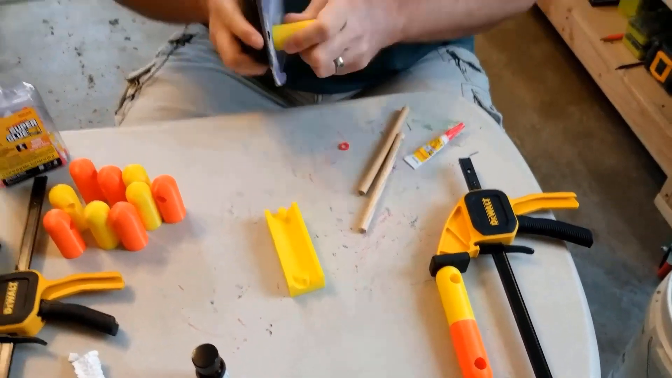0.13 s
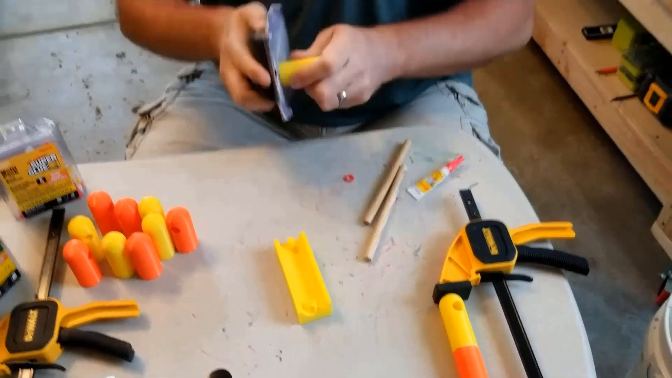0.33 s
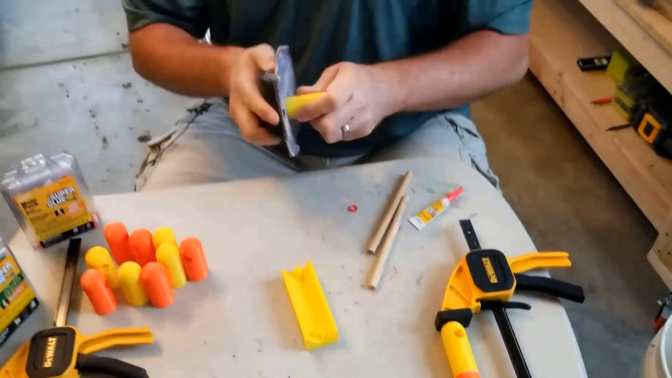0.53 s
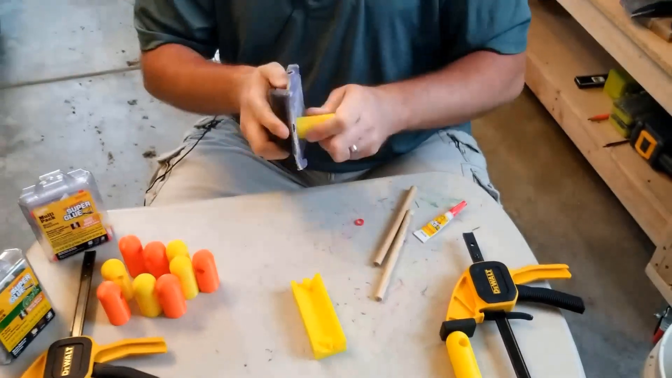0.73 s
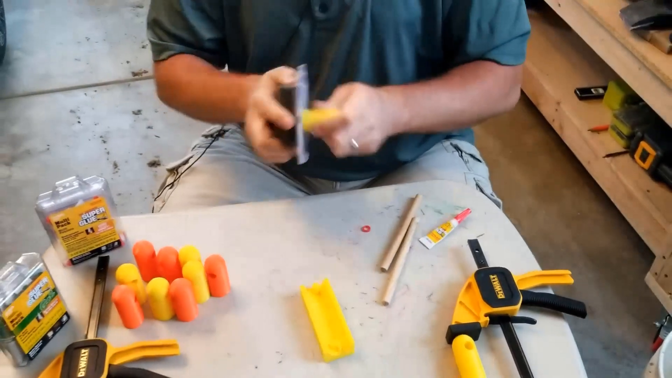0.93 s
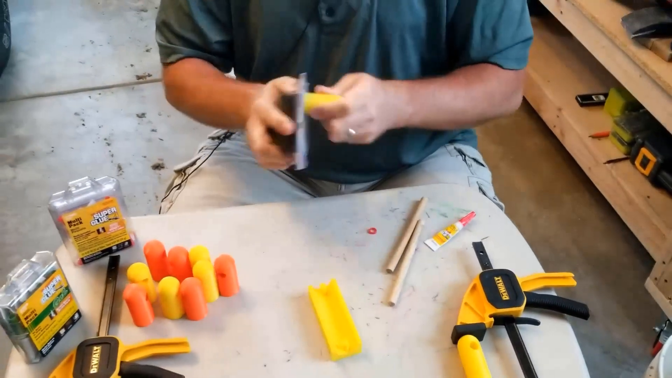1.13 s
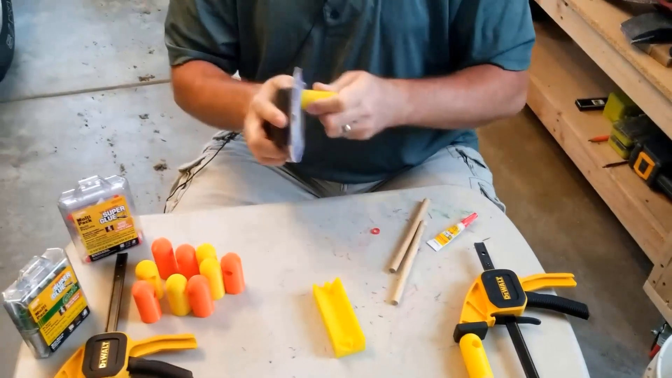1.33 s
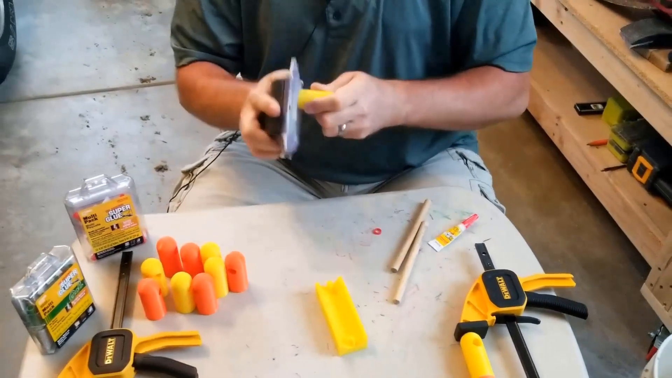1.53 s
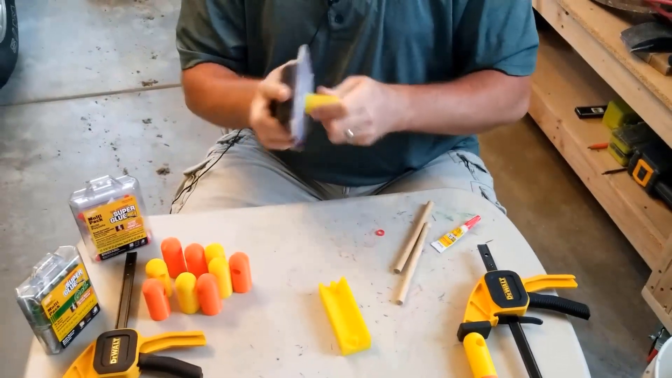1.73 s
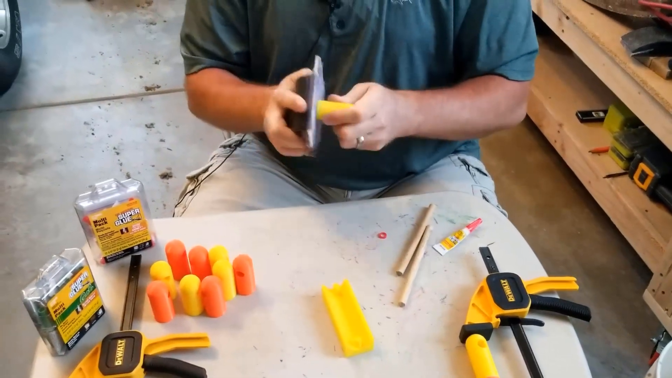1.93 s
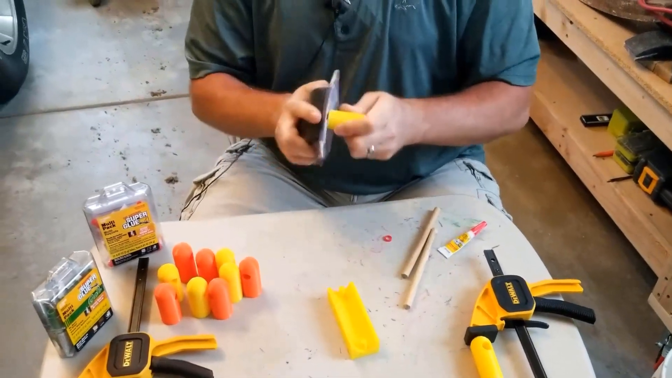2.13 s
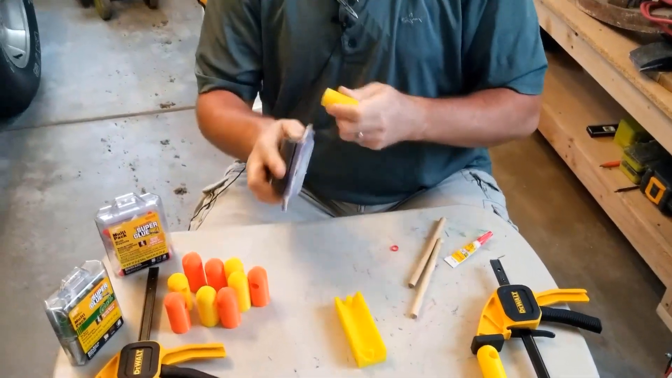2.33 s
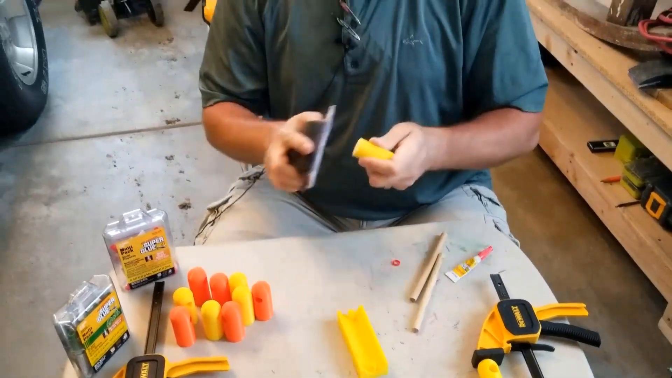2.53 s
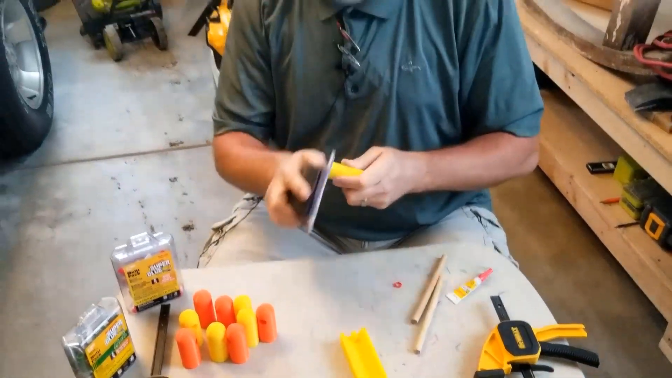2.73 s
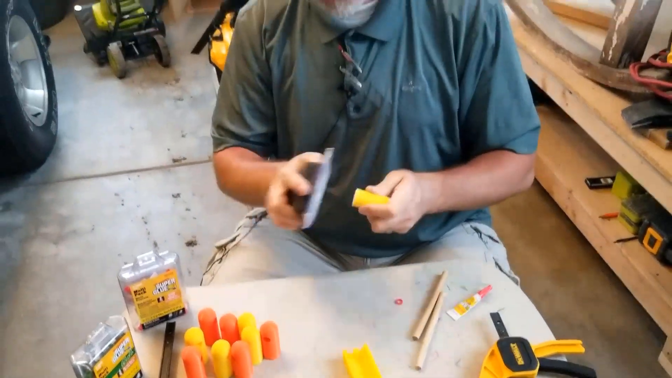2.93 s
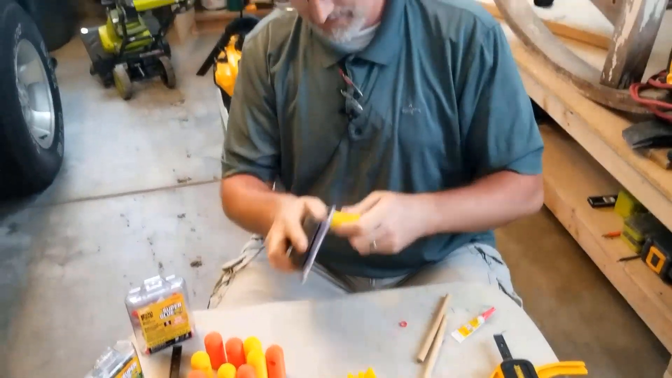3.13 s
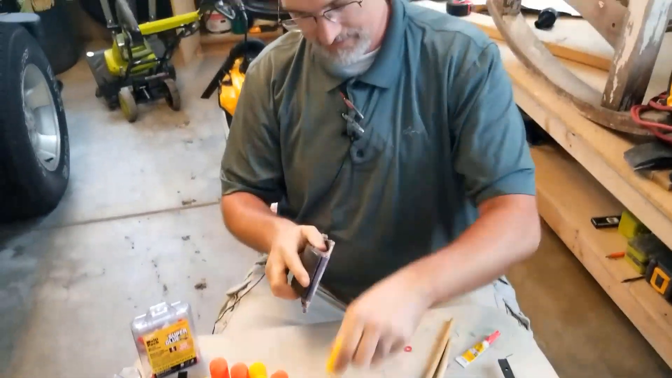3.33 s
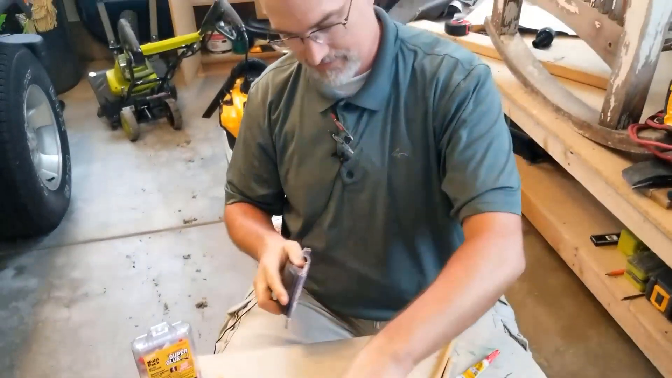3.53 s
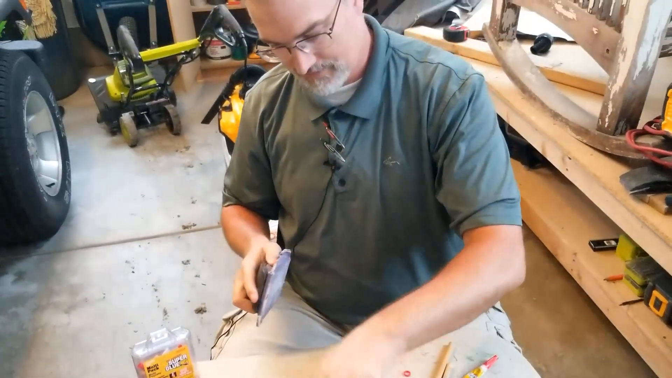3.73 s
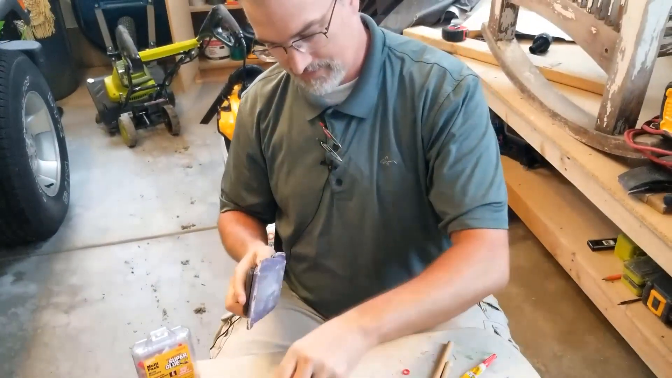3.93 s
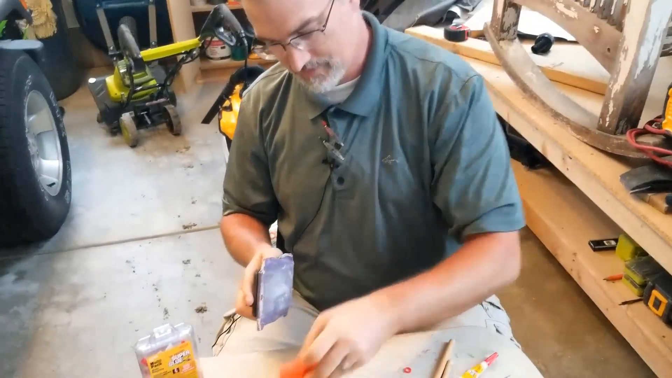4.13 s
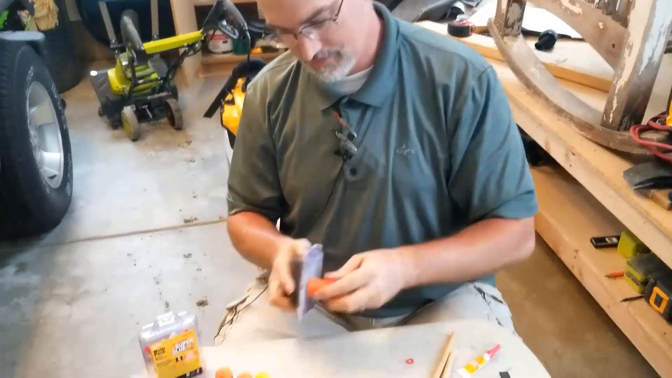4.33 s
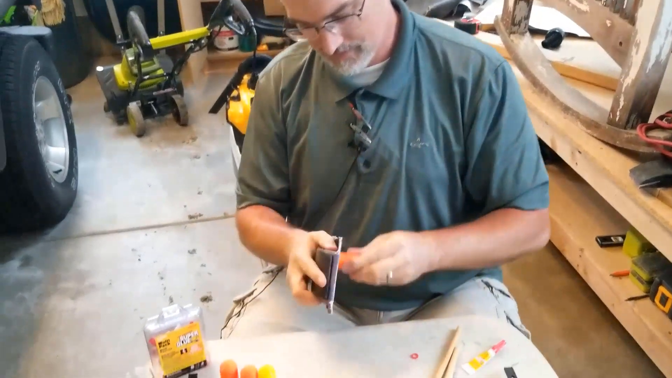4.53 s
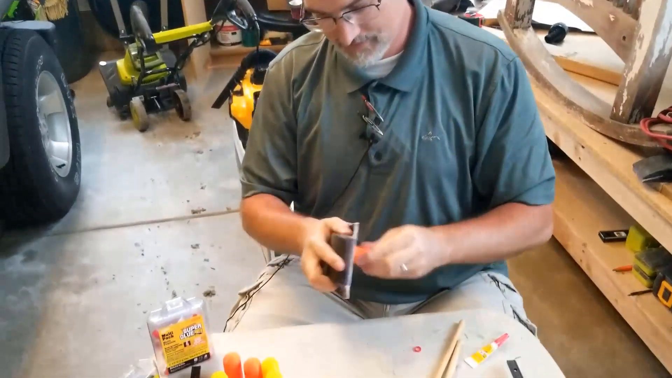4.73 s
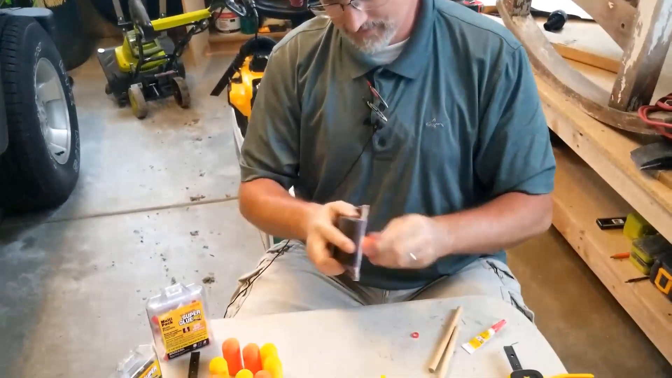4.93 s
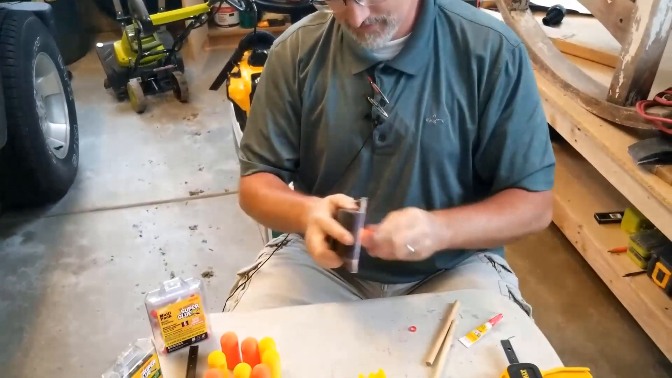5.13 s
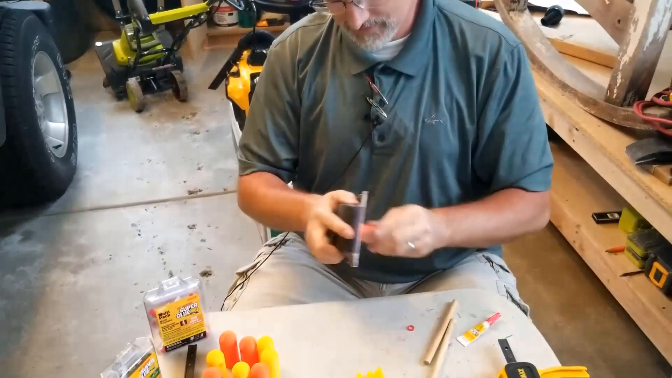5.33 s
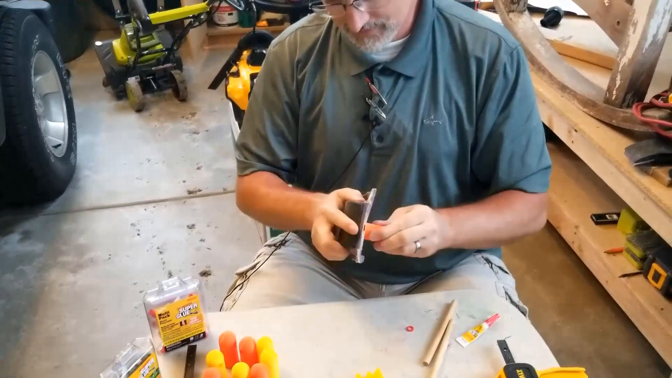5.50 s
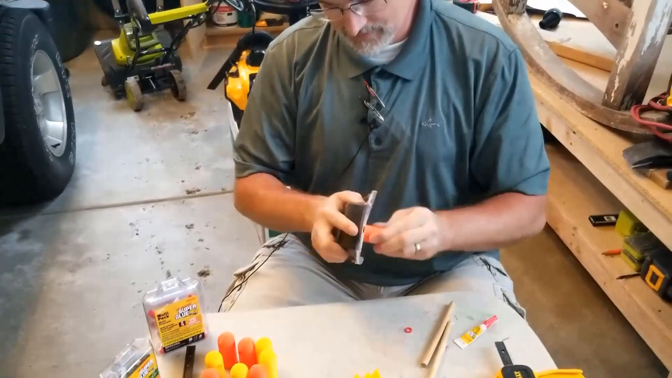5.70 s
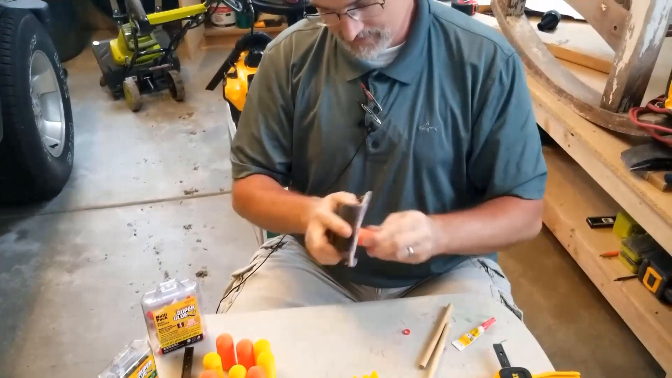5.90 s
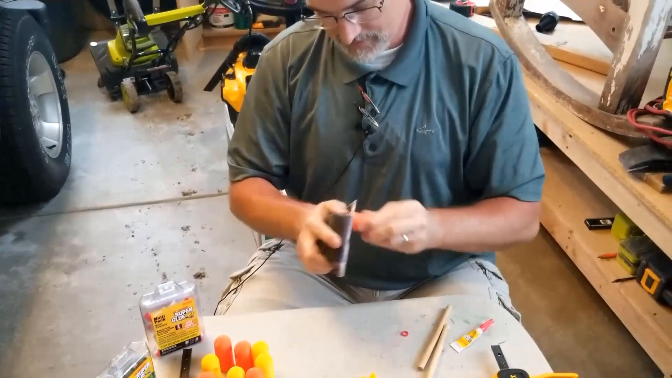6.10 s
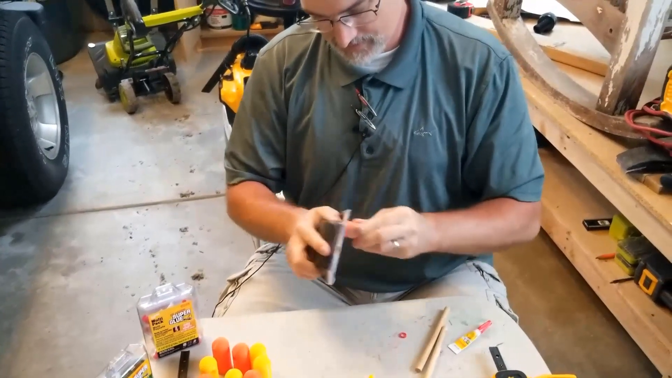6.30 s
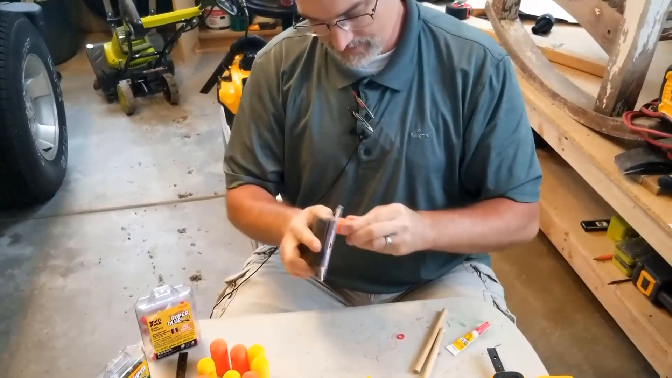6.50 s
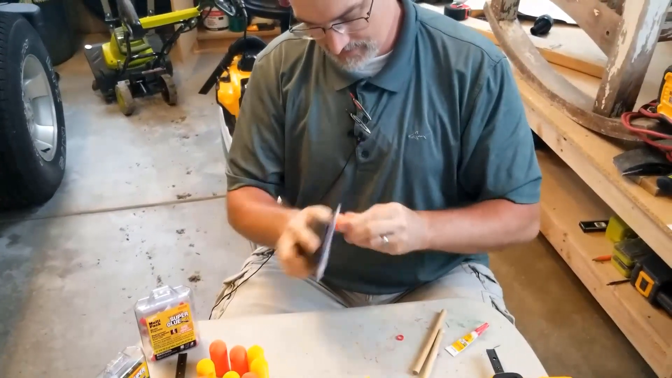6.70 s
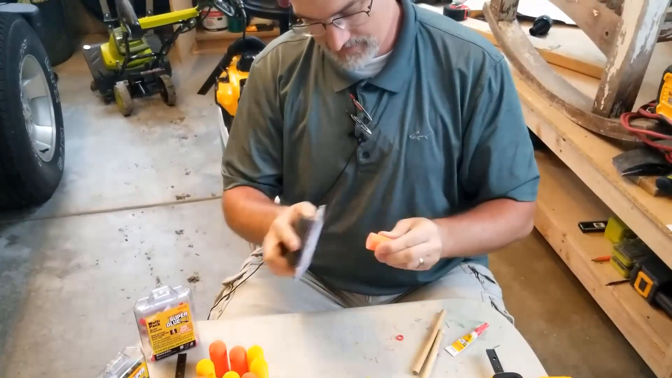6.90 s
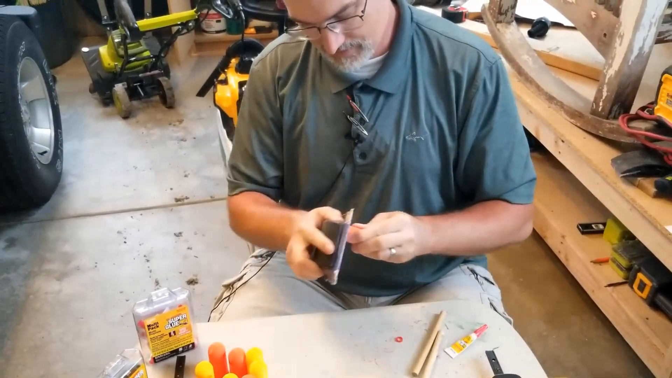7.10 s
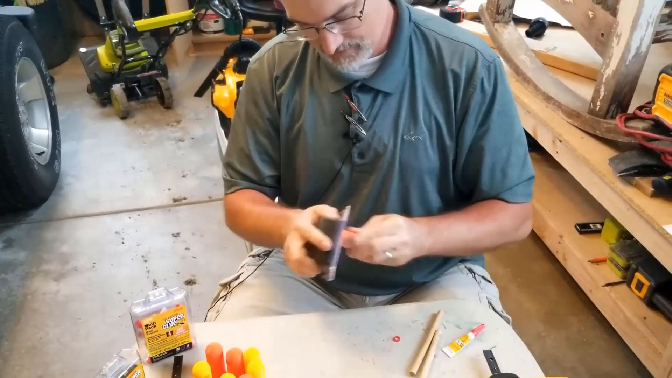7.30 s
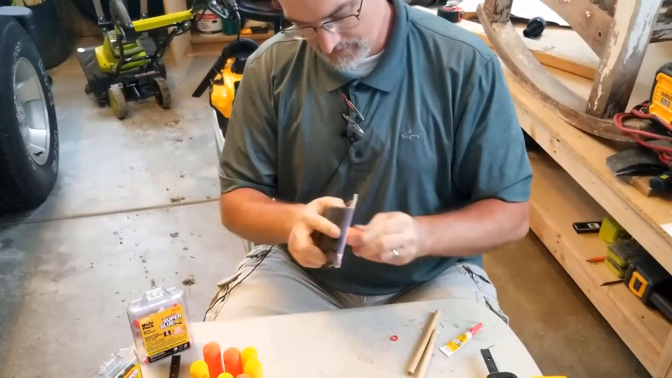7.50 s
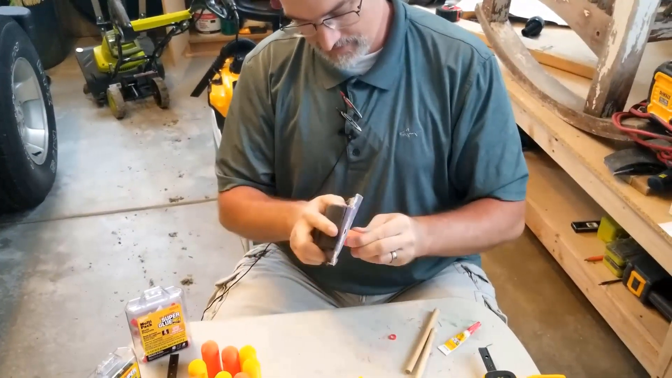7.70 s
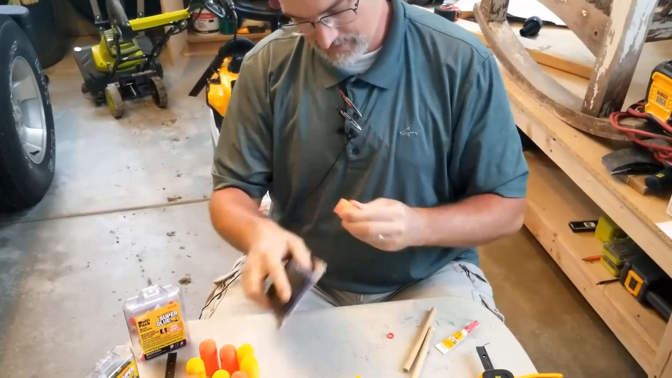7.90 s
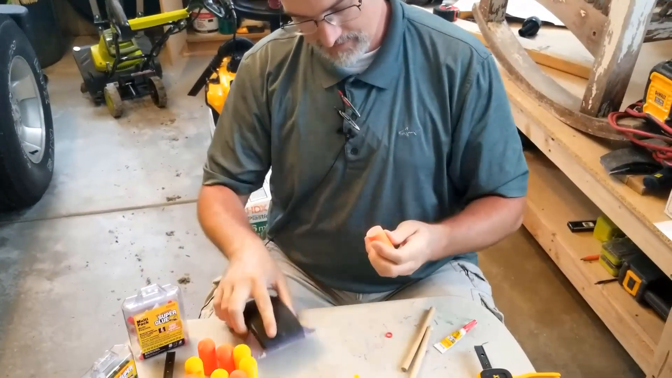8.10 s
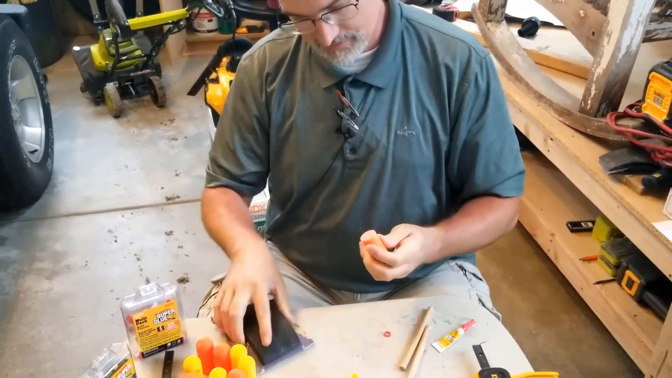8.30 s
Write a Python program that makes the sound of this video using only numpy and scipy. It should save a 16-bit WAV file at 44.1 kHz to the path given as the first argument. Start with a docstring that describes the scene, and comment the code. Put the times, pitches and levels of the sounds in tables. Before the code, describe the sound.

A small plastic part scrapes back and forth on a hand-held sandpaper pad right from the start, about ten short, gritty strokes a second. Around 2 seconds the rubbing loosens into separate scrapes and flicks, with sharp taps on the pad at about 2.7 and 3 seconds. At 3.5 seconds a piece is set on a hollow table with a clear, briefly ringing knock, followed by a lull.

Light taps at 4.5 seconds start a second run of fast, bright sanding. At 6.7 seconds the part slips off the edge with a sharp click, then taps back on just after 7 seconds. More strokes end in a flick near 7.9 seconds, and the pad is put down with soft knocks around 8.2 seconds. The sound is close and mono, with occasional faint low thumps and air puffs on the microphone and a short garage echo over quiet background air.

```python
"""A small plastic part is rubbed to and fro by hand on sandpaper held on a pad, close to a mono microphone.
Grit clicks ring the pad, which jolts as the hand turns and twangs as the part catches or slips off.
The part taps the pad; things are set down on a hollow table. Low thumps and draughts reach the
microphone directly. Bare garage walls add a short tail over a quiet noise floor."""
import sys
import numpy as np
from scipy import signal
from scipy.io import wavfile
from scipy.ndimage import uniform_filter1d

SR = 44100
rng = np.random.default_rng(int(sys.argv[2]) if len(sys.argv) > 2 else 0)


def wav_out(sig):
    """Save sig, one row per channel (or a flat mono array), as 16-bit PCM at SR to the path in sys.argv[1]."""
    wavfile.write(sys.argv[1], SR, np.round(np.clip(np.atleast_2d(sig).T, -1, 1) * 32767).astype(np.int16))


N = 368235


def sanding(uneven_db=2.0, chatter_db=2.0, patch_db=2.1, grip_scatter=0.02):
    """The part breaks loose and slides: grit clicks of uneven size ring four groups of resonances."""
    # (start [s], length [s], level [dB], swell from start to end [dB], kind)
    strokes = [(.008, .08, -24, 10.5, "push"), (0.112, 0.092, -29.5, -1, "pull"),
               (0.212, 0.082, -27.5, 6, "push"), (.31, 0.076, -30, 6, "pull"),
               (0.408, 0.088, -28.5, 4, "push"), (0.512, 0.084, -32, -0.5, "pull"),
               (0.607, 0.089, -28, 7.5, "push"), (0.709, 0.1, -31.5, 0.5, "pull"),
               (0.814, 0.099, -27, 5.5, "push"), (.928, .044, -30.5, 5, "pull"),
               (.963, 0.093, -29.5, -2.5, "out"), (1.032, 0.066, -30, -2, "in"),
               (1.077, 0.075, -28.5, -5, "out"), (1.132, 0.075, -31, -2, "in"),
               (1.19, 0.079, -28.5, -4, "out"), (1.253, 0.076, -28, -0.5, "in"),
               (1.312, 0.064, -28.5, -5, "out"), (1.378, 0.16, -33.5, -5.5, "out"),
               (1.474, .13, -31, 3.5, "in"), (1.598, .044, -30, 6.5, "in"),
               (1.635, 0.099, -29.5, -6, "out"), (1.709, 0.095, -30, 5, "in"),
               (1.783, 0.099, -28, -3, "out"), (1.874, 0.081, -32, -7, "out"), (1.948, .14, -32, 0.5, "in"),
               (2.072, 0.14, -30, 1, "in"), (2.228, 0.077, -28, 11.5, "drag"),
               (2.301, .032, -23, 7, "flick"), (2.329, 0.031, -42, -13, "shiver"),
               (2.665, 0.16, -29, -3.5, "ease"), (2.75, 0.033, -28.5, 2, "flick"),
               (3.047, .12, -35, -5.5, "ease"), (3.187, 0.038, -48.5, -8, "brush"),
               (4.471, 0.028, -46.5, 2, "brush"), (4.503, .12, -29, 9, "push"),
               (4.648, 0.078, -29.5, -0.5, "pull"), (4.753, 0.089, -28, 6, "push"),
               (4.868, .09, -29.5, 1, "pull"), (4.968, 0.078, -27.5, 6, "push"),
               (5.07, 0.09, -31.5, -.5, "pull"), (5.168, 0.084, -26, 4.5, "push"),
               (5.273, 0.079, -28.5, 1, "pull"), (5.372, 0.074, -24.5, 11, "push"),
               (5.472, 0.086, -28.5, 3, "pull"), (5.578, 0.08, -25, 9, "push"),
               (5.676, 0.087, -28, 3, "pull"), (5.784, 0.081, -25, 5.5, "push"),
               (5.876, 0.093, -27.5, 1, "in"), (5.988, .071, -28, 1.5, "in"),
               (6.039, 0.08, -25, -0.5, "out"), (6.112, 0.08, -29, -7, "in"),
               (6.182, .088, -30.5, 4.5, "in"), (6.252, 0.095, -29, -6.5, "out"),
               (6.336, .12, -31, -13, "out"), (6.426, .11, -29.5, 5.5, "out"),
               (6.542, .12, -28.5, -8, "ease"), (6.671, 0.071, -27.5, 7.5, "drag"),
               (6.734, .032, -19, 4, "flick"), (6.767, 0.015, -34, -14, "shiver"),
               (7.067, .1, -31, 3, "ease"), (7.198, 0.083, -30.5, 0, "pull"), (7.303, .089, -26, 4, "push"),
               (7.412, .088, -27, 5.5, "push"), (7.524, 0.1, -30.5, 1.5, "pull"),
               (7.666, 0.076, -28, 6, "drag"), (7.788, .01, -32.5, 2, "drag"),
               (7.802, .064, -28, 11.5, "drag"), (7.866, 0.012, -21, -3, "flick"),
               (7.877, 0.034, -37, -3, "shiver"), (8.084, 0.041, -43.5, -12, "brush"),
               (8.127, .05, -45.5, -6, "brush"), (8.189, 0.076, -42.5, -10, "brush"),
               (8.323, 0.057, -49, 8, "brush")]
    # push, pull: straight; out, in: half circles to the pad's edge and back; ease: gentle, after landing;
    # drag: hard last stroke; flick: tears off the edge; shiver: freed pad trembles; brush: light touch
    # kind: (start softness, end softness, scratch [Hz], ring [Hz], treble [dB], ring [dB],
    #        ring swell [dB], rasp [dB])
    kinds = {"push": (0.3, 0.65, 6252, 3020, -3.2, -0.9, 7.5, 0.9),
             "pull": (0.28, .51, 5950, 3012, -4, .2, -12, 4.5),
             "out": (0.43, 0.35, 5950, 3154, -3, 2.1, 8, 1.4),
             "in": (0.48, 0.39, 5650, 3210, -4, 0.5, -9.5, 1.9),
             "ease": (0.94, 0.73, 5650, 3080, -2, 1, 0, 3.5),
             "drag": (0.18, 0.35, 5550, 2948, -2, 1.3, 5, 5),
             "flick": (0.3, 0.44, 5500, 3153, -3, 5.5, -3, 1),
             "shiver": (-0.6, 0.3, 5200, 2850, -14, 11, -3.5, 7),
             "brush": (0.8, 0.6, 5600, 3000, -6.5, 2, -1, 11.5)}
    # slowly changing hold (time [s], scratch pitch [x], ring pitch [x], ring [dB], rasp [dB], treble [dB])
    hold = [(0, 1.03, 1, -.5, -1.5, -.3), (.8, 1.02, 1.01, -.5, -0.5, -0.5),
            (1.05, 1, 1.03, .5, -0.5, -0.2), (1.3, 0.97, 1.02, .3, -1, -0.2), (1.6, 1.01, 1, .3, 0, 0.5),
            (1.9, .99, 0.97, 1.5, 2, 0), (2.15, 1.01, 1.01, -1, -1, 1), (2.7, 0.99, 1.06, .5, 1, 0),
            (3.1, 0.94, 1, 3, 2, -1), (4.5, 0.93, .92, -.5, 3, -0.5), (4.9, 1, 0.99, -1.5, 1, 1),
            (5.3, 1.01, .99, 1.5, 0.1, -.3), (5.7, 0.98, 1.02, -.5, -0.1, 1.5),
            (6.05, 1.03, 0.99, 1, -1.5, 1), (6.3, 1.01, .99, -1, 1, -1), (6.7, 1.04, 1.03, -1, -1.5, -0.3),
            (7.2, 0.97, 1.03, 0, -1.5, 0.7), (7.5, 0.91, 0.98, 1.5, 2, 0.3),
            (7.7, 0.98, 0.9, 1.5, 0.5, -3.5), (7.85, 1.02, 1.01, -1.2, -1.5, 1.5),
            (8.1, 1.07, 1.03, 4, 5, 3), (8.35, 0.99, 0.97, -2, -.5, 0)]
    # low rasp (centre [Hz], width [Hz], level [dB])
    rasp = [(454, 600, -22.5), (920, 690, -38.5), (1484, 710, -18.5)]
    # pad ring (centre [x ring_hz], width [x ring_hz], level [dB])
    ring = [(0.823, 0.15, -15.5), (.95, 0.087, -15), (1.099, 0.26, -11.5)]
    # part on paper (centre [x scratch_hz], width [x scratch_hz], level [dB])
    scratch = [(.7, 0.22, -11.5), (.86, 0.19, -8), (1.0, 0.18, -6.5), (1.17, 0.31, -7.5), (1.4, 0.38, -9)]
    # finest grit (centre [Hz], width [Hz], level [dB])
    hiss = [(9440, 3900, -5.5), (11850, 6500, -2.5), (15100, 1900, -3.5)]
    hold_s, *hold_columns = np.transpose(hold)
    grips = 1 + grip_scatter * rng.standard_normal((len(strokes), 2))  # each grip detunes its stroke
    out = np.zeros(N)
    for (start_s, length_s, db, swell_db, kind), grip in zip(strokes, grips):
        soft_in, soft_out, scratch_hz, ring_hz, treble_db, ring_db, ring_swell_db, rasp_db = kinds[kind]
        held = [np.interp(start_s, hold_s, column) for column in hold_columns]
        scratch_hz, ring_hz = grip * held[:2] * (scratch_hz, ring_hz)
        ring_db, rasp_db, treble_db = np.add(held[2:], (ring_db, rasp_db, treble_db))
        progress = np.linspace(0, 1, int(length_s * SR))
        arch = progress ** max(soft_in, 0.03) * (1 - progress) ** soft_out
        speed = arch / arch.max() * undb(swell_db * (progress - 0.5))
        speed = np.pad(speed, (0, 400))  # room to ring out
        n = len(speed)
        grain_db = uneven_db * np.minimum(rng.exponential(size=n), 4.5)  # capped at the coarsest grain
        grit = unit(undb(grain_db + chatter_db * walk(201.2, n)))
        # the pad rings most with the part near its edge
        edge = speed * undb(ring_swell_db * np.linspace(-0.5, 0.5, n))
        voices = [(hz, width_hz, gain_db + rasp_db, speed) for hz, width_hz, gain_db in rasp]
        voices += [(k * ring_hz, w * ring_hz, gain_db + ring_db, edge) for k, w, gain_db in ring]
        # higher resonances fade more as the part slows
        voices += [(k * scratch_hz, w * scratch_hz, gain_db, speed ** (0.64 + 1.04 * k))
                   for k, w, gain_db in scratch]
        voices += [(hz, width_hz, gain_db + treble_db, speed ** 2) for hz, width_hz, gain_db in hiss]
        for hz, width_hz, gain_db, drive in voices:
            patch = undb(patch_db * walk(50, n))
            clicks = drive * patch * grit * rng.standard_normal(n)
            ringing = band(band(clicks, hz, width_hz), hz, 2 * width_hz)
            add(out, start_s, undb(db + gain_db) * np.sqrt(SR / 2 / width_hz) * ringing)
    return out


def pad_jolts():
    """The pad jolts as the hand turns."""
    # (time [s], level [dB], pitch [Hz])
    jolts = [(.116, -23.5, 477), (.316, -25, 464), (.515, -28, 467), (.714, -27, 450), (.932, -30.5, 486),
             (1.392, -31.5, 500), (1.417, -31, 492), (1.488, -29.5, 480), (1.619, -30, 438),
             (1.867, -27, 517), (2.278, -25.5, 500), (4.662, -30.5, 400), (5.077, -29, 500),
             (5.094, -30, 504), (5.276, -32, 403), (5.294, -31, 407), (5.481, -30, 299), (5.685, -30, 325),
             (5.771, -30.5, 500), (5.89, -31, 293), (6.002, -28, 380), (7.312, -30.5, 386),
             (7.532, -33, 420), (7.677, -29.5, 300), (7.811, -33, 251)]
    return pulses(jolts, cycles=1.04)


def pad_twangs():
    """The pad twangs as the part catches or slips off."""
    # (time [s], level [dB], pitch [Hz])
    twangs = [(2.805, -19, 2760), (4.888, -26, 1430), (6.742, -14, 3050), (6.746, -8, 3160),
              (6.765, -22, 1551)]
    return pulses(twangs, cycles=2.9)


def pad_taps(tick_lead_s=0.00055):
    """An edge ticks first, then the face of the part lands on the pad."""
    # (time [s], peak [dB], contact [ms], pitch of the pad as held [x], tick re peak [dB])
    taps = [(1.96, -18, .1, 1.24, -6), (1.975, -20, .1, 1.3, -1), (1.988, -25, .1, 1.1, -2),
            (2.018, -26, .1, 0.86, 10), (2.18, -28, .1, 0.99, 17), (2.238, -23, .1, 0.96, 0),
            (2.663, -12.5, .15, 1.08, -4.5), (3.0434, -7.5, .15, .95, -8.5), (4.37, -25.5, .19, 1.07, 2.5),
            (4.486, -35, .1, .87, 10), (4.499, -23, .13, 0.94, 0), (4.507, -21, .28, 0.95, 5.5),
            (4.517, -26, .12, 1, 6), (4.526, -23, .17, 0.79, -5), (7.0552, -9.5, .25, .973, 0),
            (7.062, -23, .18, 1.4, -10)]
    # pad modes (frequency at pitch 1 [Hz], level [dB], t60 [s])
    modes = [(259, -12.5, 0.02), (480, -12.5, 0.018), (950, -9.5, 0.0087), (1485, -9.5, 0.017),
             (2614, 1.5, 0.01), (3520, 3.5, 0.0028), (4330, -5.5, 0.013), (5880, -1.5, 0.013)]
    out = np.zeros(N)
    for time_s, db, contact_ms, pitch, tick_db in taps:
        add(out, time_s, undb(db) * blow(modes, contact_ms, pitch))
        add(out, time_s - tick_lead_s, undb(db + tick_db) * tick(hz=5700))
    return out


def table_knocks():
    """Parts and pad are put down on the hollow table, which rings and rattles."""
    # (time [s], peak [dB], contact [ms], tick re peak [dB])
    knocks = [(3.5207, -7, 0.33, -7.5), (3.5302, -17, .4, -29), (4.036, -41, 0.6, -27),
              (4.051, -41, 0.97, -29), (8.095, -38, 0.22, -8.5), (8.135, -32.5, 0.68, -21),
              (8.148, -30.5, 0.61, -18.5), (8.162, -34, 1.7, -20), (8.202, -42, 1.7, -8),
              (8.229, -25, 0.6, 5), (8.236, -42, 0.45, -12), (8.256, -38, 0.95, -15.5)]
    # table modes (frequency at pitch 1 [Hz], level [dB], t60 [s])
    modes = [(210, -25, 0.092), (323, -12.5, 0.14), (368.3, -6, 0.3), (439, -10, 0.14), (526, -17.5, 0.17),
             (750, 4.5, 0.037), (1024, -5.5, 0.073), (1206, -4, 0.12), (1563, -1.5, .05),
             (2002, -9.5, 0.057), (2570, -2, 0.038), (3220, -1.5, 0.043)]
    # dense higher modes and loose things on top (centre [Hz], level [dB], t60 [s])
    rattle = [(388, -13.5, 0.44), (770, -15, 0.31), (1300, -18.5, 0.64), (2520, -22.5, 0.55),
              (4640, -11, 0.33)]
    out = np.zeros(N)
    for time_s, db, contact_ms, tick_db in knocks:
        add(out, time_s, undb(db) * blow(modes, contact_ms, pitch=0.99, rattle=rattle))
        add(out, time_s, undb(db + tick_db) * tick(hz=4560))
    return out


def blow(modes, contact_ms, pitch, rattle=()):
    """A half-sine push rings the modes, their mix varying with where it lands; peak 1."""
    t = np.arange(int(0.5 * SR)) / SR
    place_db = 1.5 * rng.standard_normal(len(modes))
    ring = np.zeros(len(t))
    for k, (hz, db, t60_s) in enumerate(modes):
        mode = np.sin(2 * np.pi * pitch * hz * t) * 1000.0 ** (-t / t60_s)
        ring += (-1) ** k * undb(db + place_db[k]) * mode  # opposed neighbours cancel the deep bass
    attack = np.minimum(t / 0.00099, 1)
    for hz, db, t60_s in rattle:
        noise = unit(steep_band(rng.standard_normal(len(t)), hz, 0.79 * hz))
        ring += undb(db) * noise * attack * 1000.0 ** (-t / t60_s)
    push = np.sin(np.linspace(0, np.pi, int(contact_ms * SR / 1000) + 3))
    struck = signal.fftconvolve(ring, push)
    return struck / abs(struck).max()


def tick(hz, decay_ms=0.45):
    """Bright crack of hard surfaces meeting; peak 1."""
    t = np.arange(int(0.01 * SR)) / SR
    burst = rng.standard_normal(len(t)) * np.exp(-1000 * t / decay_ms)
    crack = steep_band(burst, hz, 0.88 * hz)
    return crack / abs(crack).max()


def mic_thumps():
    """Low thumps at the microphone."""
    # (time [s], level [dB], pitch [Hz])
    thumps = [(.747, -29, 220), (.76, -30, 219), (2.314, -30.5, 192), (2.341, -33, 142), (2.388, -36, 129),
              (2.508, -33, 161), (2.538, -31, 148), (2.56, -31, 171), (2.585, -31, 160),
              (2.609, -28.5, 217), (2.631, -33, 190), (2.679, -29, 175), (2.758, -36, 151),
              (2.845, -39, 151), (2.895, -40, 140), (4.347, -29, 159), (4.374, -29, 158), (4.395, -35, 171),
              (4.42, -39, 169), (4.445, -40, 155), (4.465, -42, 147), (4.521, -40, 177), (4.687, -29, 212),
              (6.343, -24.5, 186), (6.454, -34, 185), (6.47, -23, 204), (6.485, -28, 171.3),
              (8.233, -31, 170), (8.247, -33, 160), (8.26, -33, 180), (8.32, -38, 180)]
    return pulses(thumps, cycles=1.42)


def draughts(hz=110, width_hz=120, gust_db=4):
    """Draughts rumble on the microphone in short puffs."""
    # (time [s], level [dB])
    contour = [(0, -78), (.55, -66), (.72, -48), (.93, -69), (2.2, -72), (2.44, -50), (2.72, -49), (3, -66),
               (3.12, -91), (4.11, -87), (4.35, -51), (4.53, -47), (4.65, -64), (4.88, -52.5), (5.1, -68),
               (6.28, -78), (6.35, -43), (6.5, -52), (6.81, -55), (7.09, -89), (8.09, -79), (8.35, -62)]
    time_s, db = np.transpose(contour)
    level = undb(np.interp(np.arange(N) / SR, time_s, db))
    puffs = rng.standard_normal(N) * undb(gust_db * walk(30))
    return level * unit(steep_band(puffs, hz, width_hz))


def garage_tail(x, build_ms=5):
    """Bare walls return dense echoes, each band dying at its own rate."""
    # (centre [Hz], t60 [s], relative level [dB])
    bands = [(202, 0.61, -16), (508, 0.67, -7), (1230, 0.34, -6.5), (2810, .55, -7.5), (5600, 0.61, -12),
             (11420, 0.2, -6)]
    t = np.arange(int(0.8 * SR)) / SR
    echoes = np.zeros(len(t))
    for hz, t60_s, db in bands:
        noise = unit(steep_band(rng.standard_normal(len(t)), hz, hz))
        gain = undb(db) * np.sqrt(hz / t60_s)  # scaled for bandwidth and decay length
        echoes += gain * noise * 1000.0 ** (-t / t60_s)
    build = np.minimum(1000 * t / build_ms, 1)
    return signal.fftconvolve(x, 4 * echoes * build / SR)[:N]


def noise_floor(level_db=-58.5, waver_db=1.2):
    """Quiet air: half-octave noise bands that waver independently."""
    # (frequency [Hz], relative density [dB])
    spectrum = [(18, -72), (30, -59), (92, -7), (150, -15.5), (222, -0.5), (304, -16.5), (794, -14),
                (4310, -29), (4900, -26), (9390, -32.5), (15000, -35.5)]
    spectrum_hz, spectrum_db = np.transpose(spectrum)
    out = np.zeros(N)
    for hz in 40 * 2 ** np.arange(0, 8.6, 0.5):
        db = np.interp(np.log(hz), np.log(spectrum_hz), spectrum_db) + waver_db * walk(4)
        out += undb(db) * steep_band(rng.standard_normal(N), hz, hz / 2)
    return unit(out) * undb(level_db)


def pulses(events, cycles):
    """Gaussian wavelets of random phase, centred on their times."""
    out = np.zeros(N)
    for (time_s, db, hz), phase in zip(events, rng.random(len(events))):
        t = np.arange(-2 * cycles / hz, 2 * cycles / hz, 1 / SR)
        envelope = undb(db) * np.exp(-(2 * t * hz / cycles) ** 2)
        add(out, time_s + t[0], envelope * np.sin(2 * np.pi * (hz * t + phase)))
    return out


def undb(db):
    return 10 ** (np.asarray(db) / 20)


def unit(x):
    return x / np.sqrt(np.mean(x ** 2))


def band(x, hz, width_hz):
    """Two-pole resonance, gain 1 at the centre."""
    return signal.lfilter(*signal.iirpeak(hz, hz / width_hz, fs=SR), x)


def steep_band(x, hz, width_hz):
    """Two equal resonances in series."""
    return band(band(x, hz, width_hz), hz, width_hz)


def walk(rate_hz, size=N):
    """Slewed random steps; spread near 1."""
    step = int(SR / rate_hz)
    levels = np.repeat(rng.standard_normal(size // step + 1), step)
    return 1.05 * uniform_filter1d(levels, step)[:size]


def add(out, time_s, x):
    """Mix x into out from time_s."""
    i = max(int(time_s * SR), 0)
    out[i:i + len(x)] += x[:len(out) - i]


def scene():
    """Handwork with its room tail, plus dry thumps, draughts and floor; two equal channels."""
    near = sanding() + pad_jolts() + pad_twangs() + pad_taps() + table_knocks()
    mono = near + garage_tail(near) + mic_thumps() + draughts() + noise_floor()
    return np.array([mono, mono])


def record(dry, bass_hz=100, treble_hz=12000, top_hz=15330):
    """The microphone drops the deep bass and softens the treble; the recorder cuts the top."""
    thin = signal.sosfilt(signal.butter(2, bass_hz, "high", fs=SR, output="sos"), dry)
    soft = signal.sosfilt(signal.butter(1, treble_hz, fs=SR, output="sos"), thin)
    return signal.sosfilt(signal.ellip(10, 0.3, 70, top_hz, fs=SR, output="sos"), soft)


dry = scene()
out = record(dry)
wav_out(out)
```